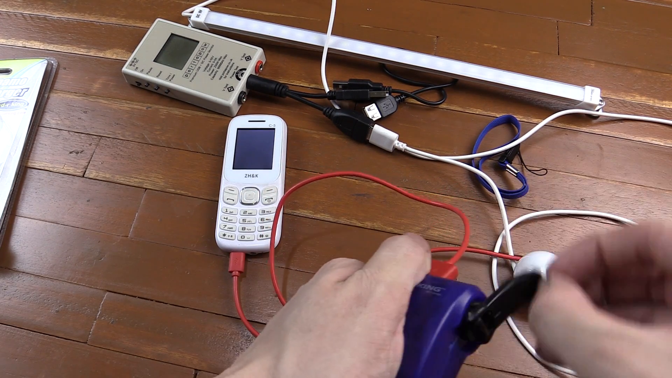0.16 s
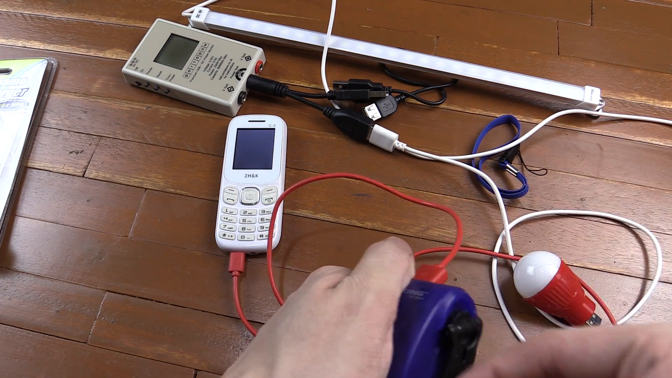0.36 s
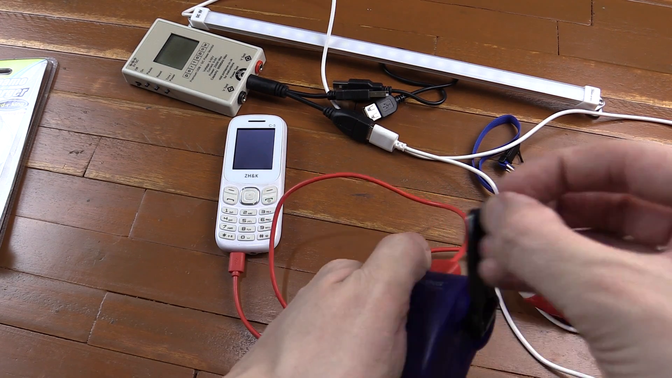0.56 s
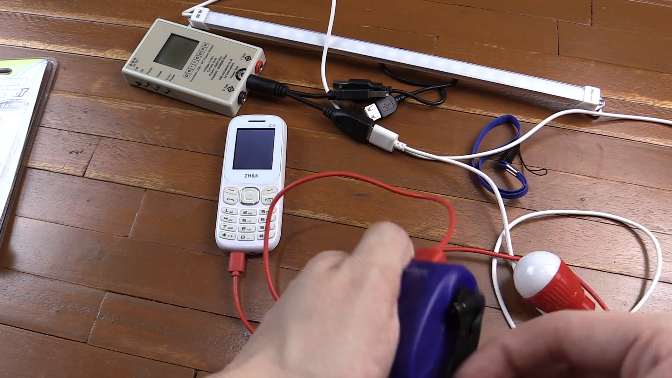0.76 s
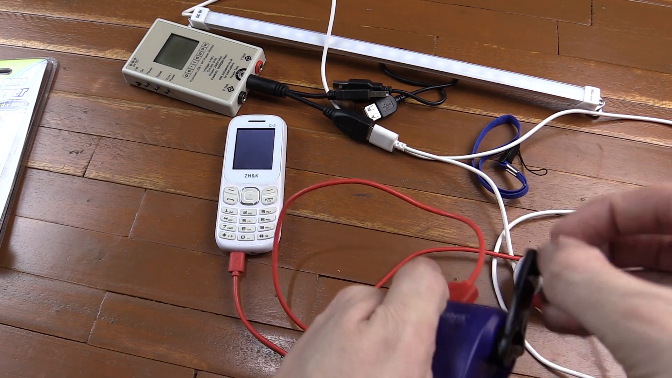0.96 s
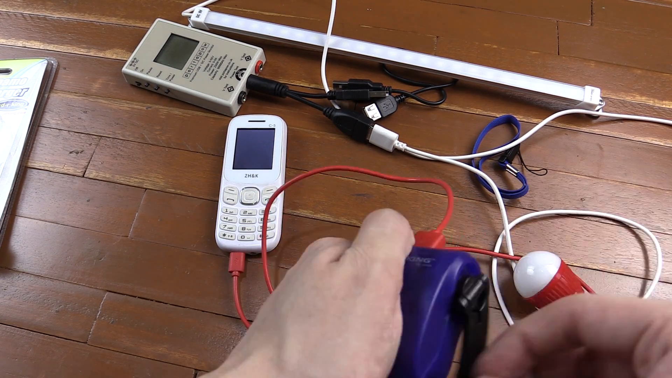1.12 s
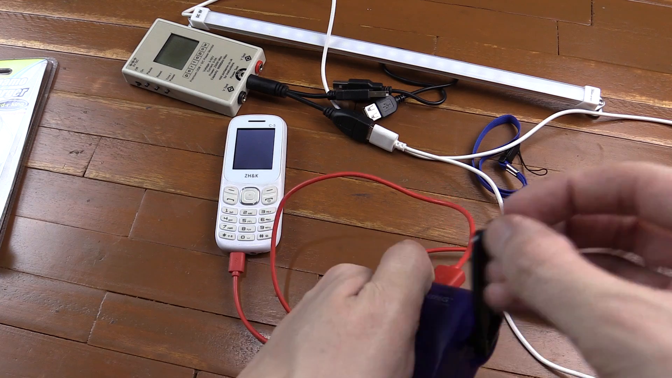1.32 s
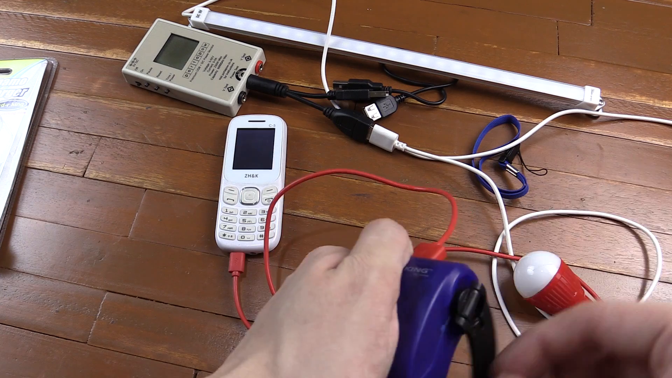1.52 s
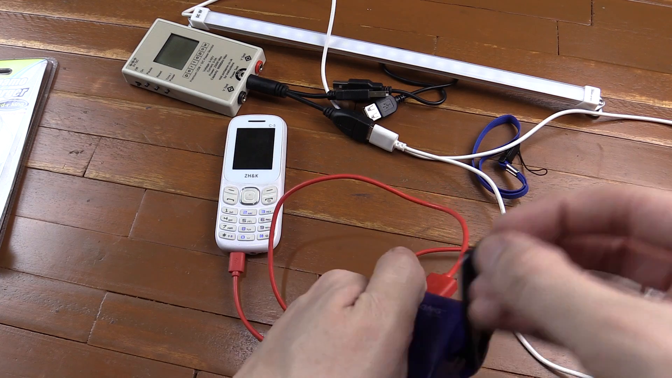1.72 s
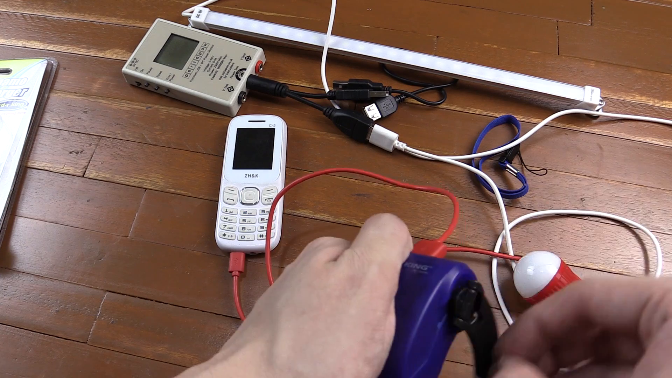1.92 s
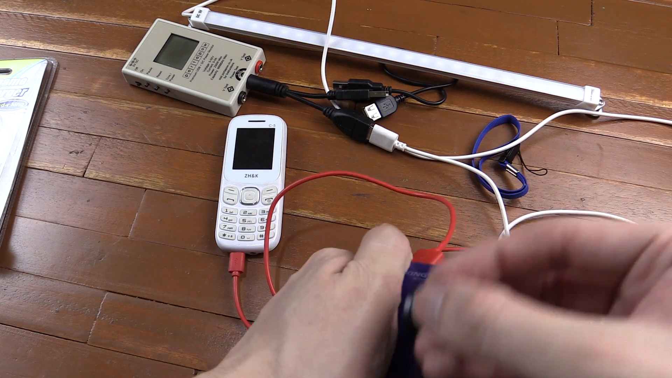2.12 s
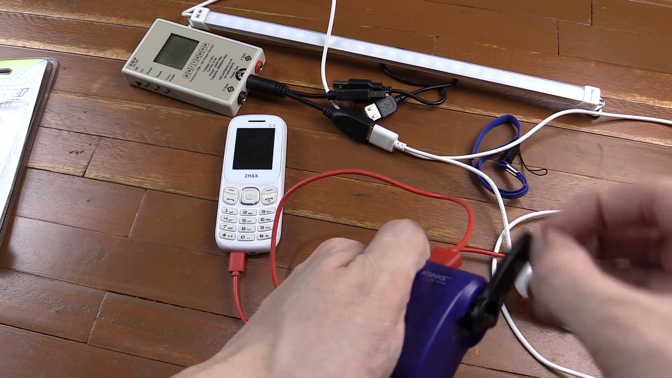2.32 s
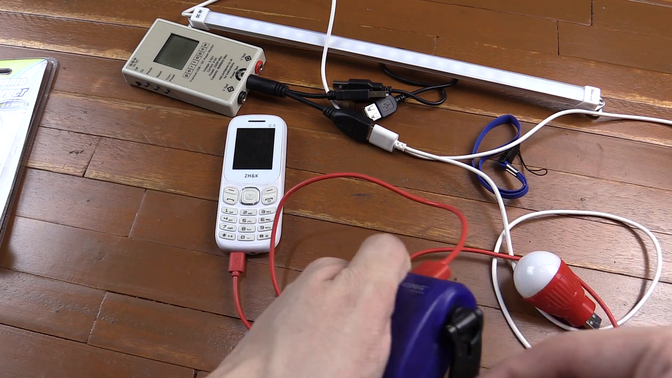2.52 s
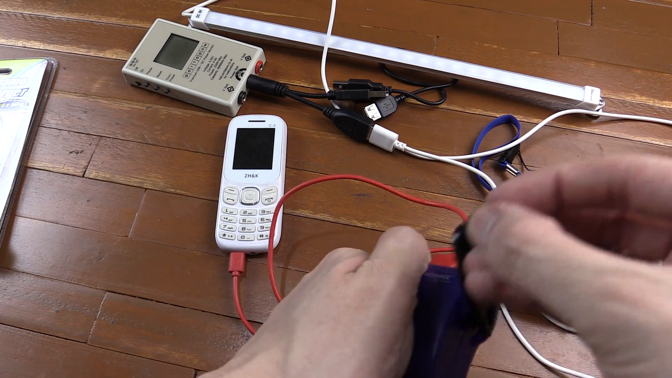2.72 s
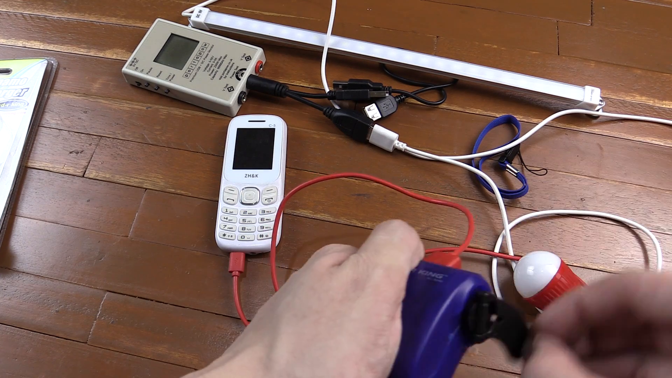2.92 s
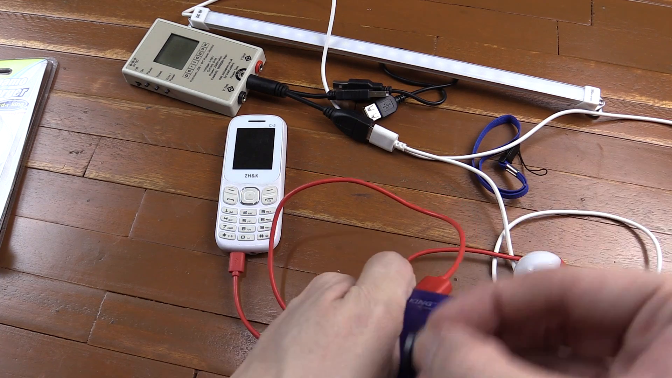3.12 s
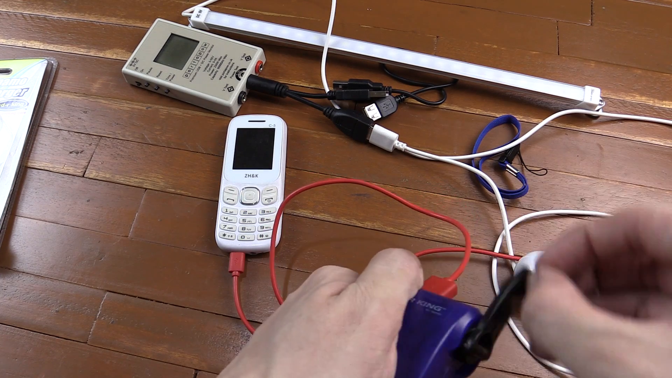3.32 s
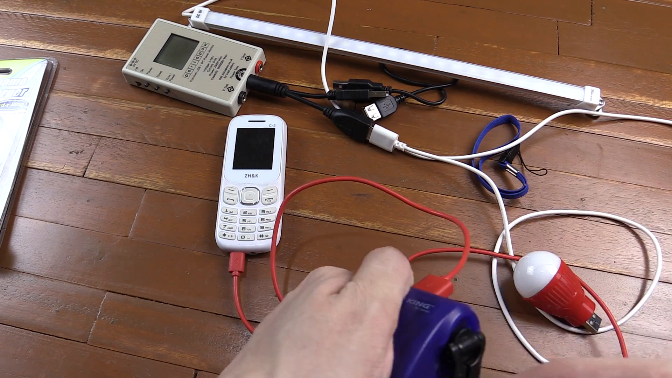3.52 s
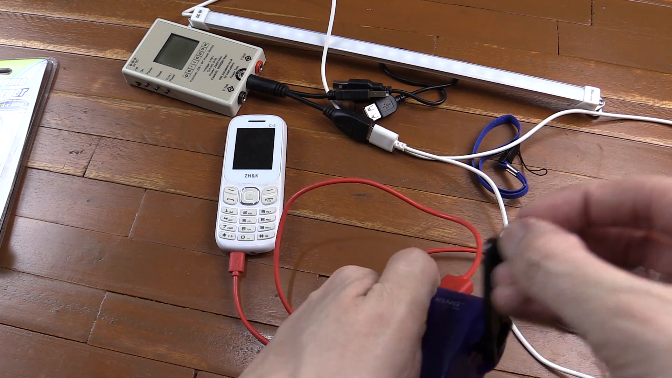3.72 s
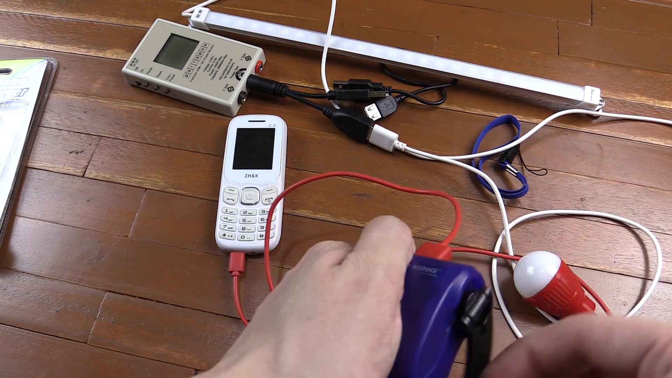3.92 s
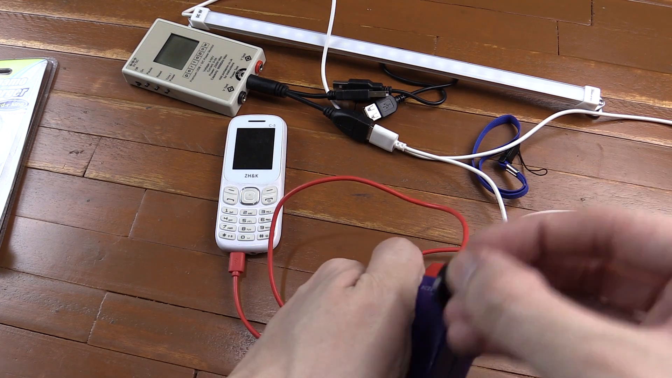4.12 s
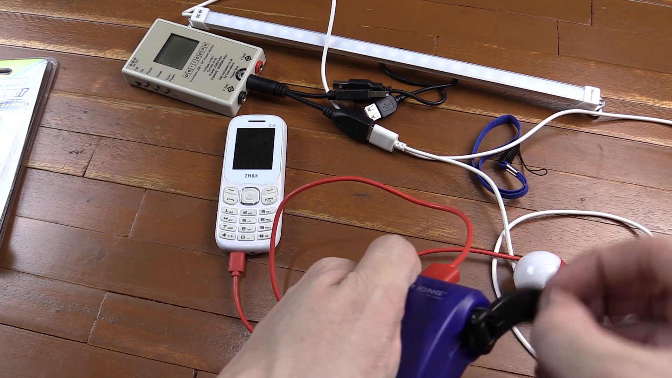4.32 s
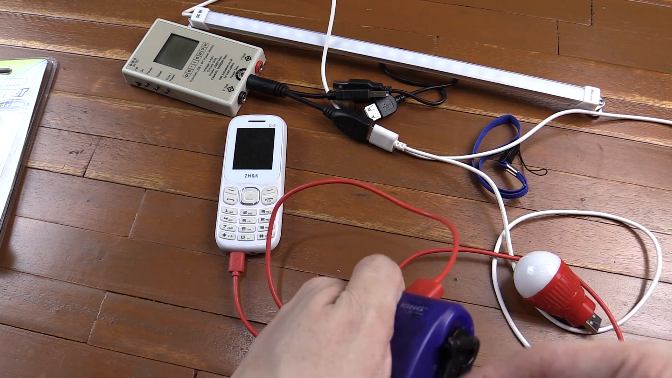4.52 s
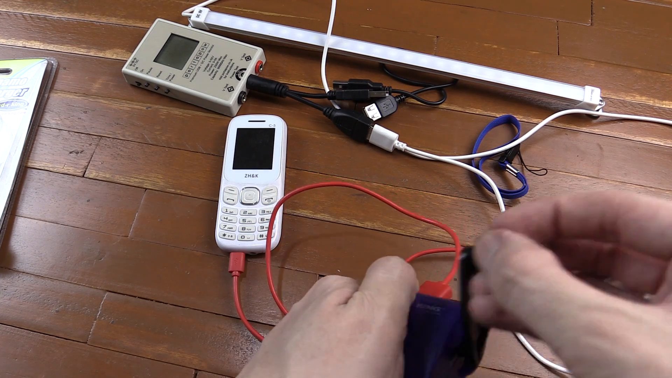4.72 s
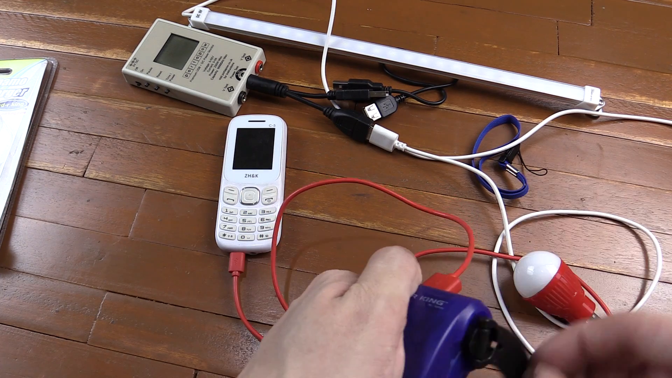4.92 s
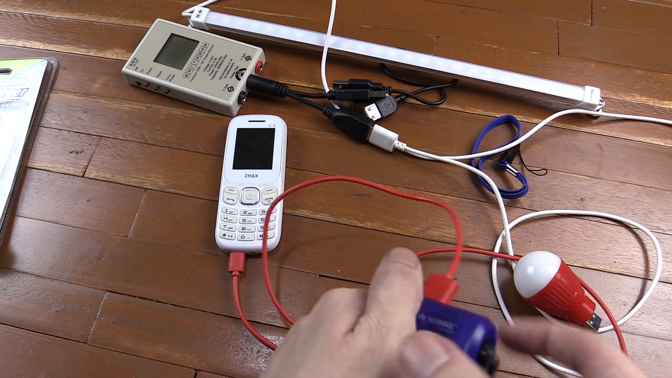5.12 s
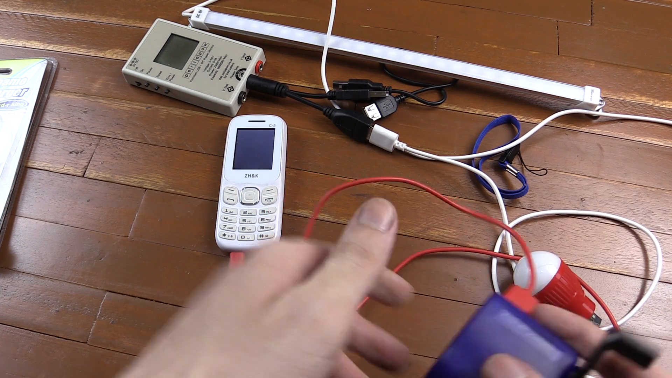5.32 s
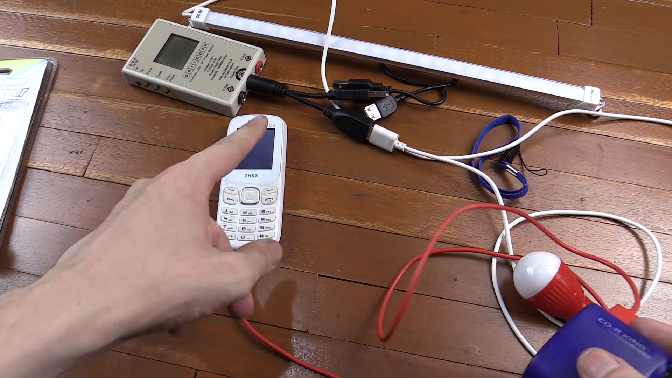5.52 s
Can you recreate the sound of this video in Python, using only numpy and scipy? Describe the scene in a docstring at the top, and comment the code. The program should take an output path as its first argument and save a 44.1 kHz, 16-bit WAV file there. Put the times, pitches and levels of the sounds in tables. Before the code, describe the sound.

Rhythmic buzzy whirring of a little hand-cranked dynamo in a quiet room, with sharp ticks of slipping teeth before it runs down into plastic creaking.

```python
"""A small plastic hand-crank dynamo, turned about twice a second above a wooden floor in a quiet room.
Place: heard in stereo, slightly to the right, with early scatter, short room sound and a low hum.
A twelve-tooth pinion whines; loose teeth rattle the casing, then bite and buzz on pushes and pulls.
Noise bursts at each tooth contact make the grinding; resonances rise through it with each turn.
Sharp ticks mark slipping teeth; the gears run down, then the casing creaks and bumps in the hands."""
import sys
import numpy as np
from scipy import signal
from scipy.fft import rfft, irfft, next_fast_len
from scipy.io import wavfile
from scipy.ndimage import uniform_filter1d, map_coordinates

SR = 44100
rng = np.random.default_rng(int(sys.argv[2]) if len(sys.argv) > 2 else 0)


def dump_mix(stems):
    """Bounce the given channels to the path in sys.argv[1] as a 16-bit WAV at rate SR."""
    frames = np.atleast_2d(stems).T  # one column per channel
    limited = np.clip(frames, -1, 1)  # hard clip at full scale
    pcm = np.round(limited * 32767).astype(np.int16)
    wavfile.write(sys.argv[1], SR, pcm)


N = 249606
TIME = np.arange(N) / SR   # s
TEETH = 12   # on the pinion


def from_db(db):
    """Decibels to gain."""
    return 10 ** (np.asarray(db) / 20)


def rms_one(x):
    """Scale to unit power."""
    return x / np.sqrt(np.mean(x ** 2) + 1e-20)


def in_time(rows):
    """One curve per column after the first (time), joined by straight lines."""
    s, *columns = np.transpose(rows)
    return [np.interp(TIME, s, column) for column in columns]


def colour(x, spectrum):
    """Causal (minimum-phase) filter through points of (frequency [Hz], gain [dB])."""
    size = 2 * next_fast_len(N)
    hz, db = np.transpose(spectrum)
    grid = np.maximum(np.fft.rfftfreq(size, 1 / SR), 1)
    gain_db = np.interp(np.log(grid), np.log(hz), db)
    # folding the cepstrum onto positive time gives minimum phase
    cepstrum = irfft(np.log(from_db(gain_db)))
    cepstrum[1:size // 2] *= 2
    cepstrum[size // 2 + 1:] = 0
    return irfft(rfft(x, size) * np.exp(rfft(cepstrum)))[..., :N]


def band(x, low, high):
    """Band-pass between two frequencies in Hz."""
    return signal.sosfilt(signal.butter(4, [low, high], "band", fs=SR, output="sos"), x)


def drift(rate):
    """Slow chance with spread 1, drawn anew `rate` times a second."""
    knots = rng.standard_normal(4000)
    return rms_one(np.interp(TIME * rate, np.arange(len(knots)), knots))


def clicks_at(times, sizes):
    """A train of single-sample clicks."""
    samples = np.clip(np.round(np.asarray(times) * SR), 0, N).astype(int)
    return np.bincount(samples, sizes, N + 1)[:N]


def random_clicks(per_s, spread_db):
    """Clicks at random moments and of uneven size."""
    sizes = from_db(spread_db * np.clip(rng.standard_normal(N), -2, 2))
    return (rng.random(N) < per_s / SR) * sizes


def bursts(clicks, t60, texture=None):
    """Every click scatters into a decaying puff of vibration, random unless a texture is given."""
    r = from_db(-60 / (t60 * SR))
    power = signal.lfilter([1], [1, -r * r], clicks ** 2 + 1e-18)
    return np.sqrt(power) * (rng.standard_normal(N) if texture is None else texture)


def even(x, span_s=0.072):
    """Take out slow swings of level, keep the grain."""
    local_power = uniform_filter1d(x ** 2, int(span_s * SR) + 1)
    return x / np.sqrt(np.maximum(local_power, 1e-12))


def resonance(x, hz, width_hz):
    """What a resonance picks out of x; its centre may move."""
    turn = np.exp(2j * np.pi * np.cumsum(np.broadcast_to(hz, x.shape)) / SR)
    r = np.exp(-np.pi * width_hz / SR)
    # shift the centre to zero, low-pass, shift back
    return 2 * np.real(turn * signal.lfilter([1 - r], [1, -r], x / turn + 1e-18))


def stroke(s, length, attack_s, release_s):
    """Force of one stroke of the hand: rise, hold, fall."""
    corners = [s - attack_s, s, s + length, s + length + release_s]
    return np.interp(TIME, corners, [0, 1, 1, 0])


# speed of the gears, braked by each push and gathering again: (time [s], tooth contacts [per s])
SPEED = [(0, 570), (.1, 528), (.27, 587), (.34, 565), (.45, 555), (.56, 585), (.83, 935), (1.08, 745),
         (1.35, 675), (1.47, 682), (1.64, 776), (1.79, 756), (1.88, 705), (2.01, 562), (2.09, 563),
         (2.24, 502), (2.5, 583), (2.62, 567), (2.69, 539), (2.8, 544), (3.05, 642), (3.25, 537),
         (3.5, 590), (3.63, 569), (3.77, 618), (3.95, 670), (4.07, 567), (4.25, 504), (4.37, 560),
         (4.55, 577), (4.77, 498), (4.85, 518), (4.96, 581), (5.03, 578), (5.11, 592), (5.4, 180)]


def gear_speed(inertia_s=.03):
    """Tooth contacts per second, smoothed by the rotor's inertia."""
    return uniform_filter1d(in_time(SPEED)[0], int(inertia_s * SR))


def free_share(speed):
    """How freely the gears spin, 0-1: at speed the teeth bounce and lose their even beat."""
    return np.interp(speed, [628, 690], [0, 1])


# the hand pulls the handle back round the bottom:
# (time [s], hold [s], force [about 1 is full], bite [0-1])
PULLS = [(0.267, 0.018, 1.17, 0.77), (0.706, 0.089, 1.05, 0.07), (1.114, 0.01, 0.63, 0.2),
         (1.554, 0.065, 0.61, 0.1), (1.89, 0.016, 0.66, 0), (2.44, 0.085, 0.87, 0.15),
         (2.9, 0.18, 0.94, 0.29), (3.442, 0.044, 1.3, 0.28), (3.88, 0.05, 0.94, 0.05),
         (4.42, 0.09, 1.05, 0.34), (4.968, 0.034, 1.17, 0.3)]
PULL_ATTACK_S, PULL_RELEASE_S = 0.17, 0.14


def pull_force(lead_s=0):
    """Force of all the pulls together, shifted earlier by lead_s."""
    return sum(force * stroke(s - lead_s, length, PULL_ATTACK_S, PULL_RELEASE_S)
               for s, length, force, _ in PULLS)


# the hand pushes the handle over the top:
# (time [s], hold [s], force [about 1 is full], grit: tilt towards treble [dB], bite [0-1])
PUSHES = [(-0.035, 0.042, 0.92, -1, 0.54), (0.453, 0.068, 0.91, -1, 0.27), (0.848, 0.013, 0.83, -1.5, 0.4),
          (1.244, 0.052, 1, -1.3, 0.02), (1.636, 0.12, 1, -0.9, 0.15), (2.074, 0.1, 0.8, -1, 0.45),
          (2.622, 0.071, 0.85, -1.5, 0.45), (3.114, 0.11, 0.89, -0.3, 0.11),
          (3.598, 0.13, 1.02, -0.5, 0.25), (4.041, 0.072, 0.7, -1.3, 0.22), (4.58, 0.084, 0.8, -1, 0.47),
          (5.092, 0.041, 0.7, -2, 0.03)]
BITE_ATTACK_S, BITE_RELEASE_S = 0.041, 0.047


def bite_share():
    """How firmly pushes and pulls press the teeth together, 0-1."""
    strokes = [(s, length, bite) for s, length, _, _, bite in PUSHES]
    strokes += [(s, length, bite) for s, length, _, bite in PULLS]
    total = sum(bite * stroke(s, length, BITE_ATTACK_S, BITE_RELEASE_S) for s, length, bite in strokes)
    return np.clip(total, 0, 1)


def tooth_hits(turns, wear_db, chance_db, jitter_s):
    """One click per tooth; each tooth has its own strength, so the pattern repeats with the pinion."""
    tooth = np.arange(int(turns[-1] * TEETH))
    wear = rng.standard_normal(TEETH)
    wear = rms_one(wear - wear.mean())
    chance = np.clip(rng.standard_normal((4000, 2)), -2, 2)[tooth]
    times = np.interp(tooth / TEETH, turns, TIME) + jitter_s * chance[:, 0]
    return clicks_at(times, from_db(wear_db * wear[tooth % TEETH] + chance_db * chance[:, 1]))


def flanks(turns, size=900):
    """The roughness of the tooth flanks, which comes round again with every turn of the pinion."""
    roughness = rng.standard_normal(size)
    return rms_one(map_coordinates(roughness, [turns % 1 * size], order=3, mode="grid-wrap"))


FLANK_SHARE = .6   # share of the tooth scatter's power that repeats with the pinion


def loose_mesh(turns):
    """Loose pinion teeth: a click at each contact and a short scatter from the rough flanks."""
    hits = tooth_hits(turns, wear_db=1.8, chance_db=1.5, jitter_s=.00012)
    repeating = np.sqrt(FLANK_SHARE) * flanks(turns)
    scatter = repeating + np.sqrt(1 - FLANK_SHARE) * rng.standard_normal(N)
    return from_db(-3.5) * rms_one(hits) + rms_one(bursts(hits, t60=0.0086, texture=scatter))


USUAL_SPEED = 600   # tooth contacts per s


def backlash(speed):
    """The big wheels clack across their play at random, more often at higher speed."""
    clacks = random_clicks(per_s=340 * speed / USUAL_SPEED, spread_db=2.0)
    blows = rms_one(bursts(clacks, t60=0.011)) + from_db(-4) * rms_one(clacks)
    return colour(blows, [(2200, -6.0), (4500, -8.0), (7000, 5.0), (12000, -16.0)])


# click of a firmly meshed tooth: (frequency [Hz], gain [dB])
BITE_COLOUR = [(300, -36), (600, -33), (1100, -11), (1700, -3.5), (2400, -4), (3600, 3.5), (5000, -2),
               (6700, -8), (9000, -28), (15000, -47)]


def firm_teeth(turns):
    """Teeth under load click in an even train, each click with a short scatter."""
    hits = tooth_hits(turns, wear_db=1.3, chance_db=1.8, jitter_s=.000045)
    scatter = rms_one(bursts(hits, t60=.004))
    return rms_one(colour(scatter * from_db(-5) - rms_one(hits), BITE_COLOUR))


# broad response of the plastic shell: (frequency [Hz], gain [dB])
CASING = [(300, -27.5), (500, -26.5), (700, -15), (1100, -2), (1550, -1), (2150, 2.5), (2550, 2.5),
          (3300, 4), (4400, -0.5), (5500, -2.5), (6700, -1.5), (8500, -20), (12000, -30.5), (15000, -37)]
# its sharper resonances: (frequency [Hz], width [Hz], level over the broad response [dB])
CASING_MODES = [(762, 14, 0.5), (887, 5.5, 7.5), (1090, 81, -16), (1170, 26, -8), (1387, 33, -1.5),
                (1530, 33, -19), (1743, 51, 3), (1910, 140, -9), (1997, 30, -2), (2070, 22, -5),
                (2300, 71, -14), (2940, 290, -2), (3105, 41, 5.5), (3480, 28, -25), (3363, 93, 5.5),
                (3890, 45, -4), (4336, 42, 1), (5270, 18, -6), (4656, 25, -3), (5970, 160, 4),
                (6256, 16, 9.5)]


def casing(x):
    """The plastic shell: a broad response with narrow resonances on top."""
    out = x.copy()
    for hz, width, db in CASING_MODES:
        r = np.exp(-np.pi * width / SR)
        poles = [1, -2 * r * np.cos(2 * np.pi * hz / SR), r * r]
        out += from_db(db) * (1 - r * r) / 2 * signal.lfilter([1, 0, -1], poles, x)
    return colour(out, CASING)


# tooth noise, one row a band from low to high (knock, clatter, rattle, chatter, sizzle of sliding
# flanks, rub, dry scrape): (idle level [dB], added by a push [dB], by a pull [dB],
# by a doubling of speed [dB], lead on the pull [s], loss when coasting [dB per s])
CONTACT = [(-36.5, 5, 3.5, 0.5, 0.021, 68), (-40.5, 4.5, 3.3, 4, -0.032, 37),
           (-43.5, 8.5, 5.7, -5, 0.019, 64), (-40.5, 6.5, 4.7, 0, -0.021, 45),
           (-50, 10, 10.6, -3.5, 0.02, 70), (-43, 7.5, 4.4, 2, 0.035, 91), (-50, 12, 3.9, 6, -0.026, 74)]
PUSH_ATTACK_S, PUSH_RELEASE_S = 0.053, 0.1
BITE_DB = 5
STOP_S = 5.078   # the hand lets go and the tooth noise starts to fade


def contact_levels(speed, shared_db=0.95, own_db=1.0):
    """Gain of each band: strokes load the teeth, bite lifts the lower middle, the hand is unsteady."""
    pushes = [(force, grit_db, stroke(s, length, PUSH_ATTACK_S, PUSH_RELEASE_S))
              for s, length, force, grit_db, _ in PUSHES]
    push = sum(force * shape for force, _, shape in pushes)
    grit = sum(grit_db * shape for _, grit_db, shape in pushes)
    unsteady_db, bite_db = shared_db * drift(30), BITE_DB * bite_share()
    coasting_s = np.maximum(TIME - STOP_S, 0)
    octaves = np.log2(speed / USUAL_SPEED) * (TIME < STOP_S)
    levels = []
    for row, tilt in zip(CONTACT, np.linspace(-1, 1, len(CONTACT))):
        idle_db, push_db, pull_db, speed_db, lead_s, fade_db_per_s = row
        push_power = from_db(push_db * push) ** 2
        pull_power = from_db(pull_db * pull_force(lead_s)) ** 2
        load = np.sqrt(np.maximum(push_power + pull_power - 1, 1))
        stroke_db = tilt * grit + bite_db * (-1 < tilt <= 0)
        motion_db = speed_db * octaves - fade_db_per_s * coasting_s
        levels.append(load * from_db(idle_db + stroke_db + motion_db + unsteady_db + own_db * drift(20)))
    return levels


# resonances that rise through each turn of the crank: (frequency at the push [Hz], width [Hz],
# level [dB], time after the push when strongest [s], fade either way [s])
SWEEPS = [(1910, 400, -11, -0.039, 0.26), (3630, 510, -7, -0.052, 0.16), (4100, 890, -11, 0.031, 0.12),
          (4210, 530, -6.5, 0.25, 0.19)]
SWEEP_OCTAVES_PER_S = 1.1


def sweeps(x):
    """With every turn of the crank, broad resonances climb through the grinding."""
    out = x.copy()
    for s, *_ in PUSHES:
        for hz, width_hz, db, peak_s, fade_s in SWEEPS:
            near = np.abs(TIME - s - peak_s) < fade_s
            if near.any():
                t = TIME[near] - s
                swell = np.cos(np.pi / 2 * (t - peak_s) / fade_s)
                rising_hz = hz * 2 ** (SWEEP_OCTAVES_PER_S * t)
                out[near] += from_db(db) * swell * resonance(x[near], rising_hz, width_hz)
    return out


# lines of the whine: (order [cycles per pinion turn], relative level [dB], added by a full pull [dB])
WHINE_ORDERS = [(24, -48, 1), (27, -47, 1), (29, -48, 1), (32, -45, 1), (33, -43, 1), (35, -41, 1),
                (36, -38, 2.5), (48, -51, 2), (60, -53, 9), (62, -52, 8), (70, -48, 7), (72, -45, 11.5),
                (84, -49, 7), (108, -54, 5)]
# the gear wheel's own ring: (frequency [Hz], width [Hz], lift [dB])
WHEEL_RING = (1750, 91, 4.7)
WHINE_DB, FREE_LOSS_DB, WHINE_LAG_S = 1, 6, 0.033   # the whine swells just after each pull
WHINE_FLUTTER_DB, WHINE_WOBBLE_RAD = 1.6, .25   # spread of each of two drifts


def whine(turns, turns_per_s):
    """Mesh tones of the gear stages: a pull brings them out, and they swell through the wheel's ring."""
    ring_hz, width_hz, ring_db = WHEEL_RING
    pull = pull_force(-WHINE_LAG_S)
    lines = 0
    for order, db, pull_db in WHINE_ORDERS:
        lift_db = ring_db / (1 + (2 * (order * turns_per_s - ring_hz) / width_hz) ** 2)
        phase = 2 * np.pi * order * turns + WHINE_WOBBLE_RAD * (drift(20) + drift(130))
        flutter_db = WHINE_FLUTTER_DB * (drift(25) + drift(140))
        lines = lines + from_db(db + pull_db * pull + lift_db + flutter_db) * np.sin(phase)
    # spinning free, the teeth bounce and the tones weaken; they stop with the crank
    level = from_db(WHINE_DB - FREE_LOSS_DB * free_share(turns_per_s * TEETH))
    return lines * level * np.interp(TIME, [5.1, 5.15], [1, 0])


# edges of the tooth-noise bands [Hz]
CONTACT_EDGES_HZ = [250, 2100, 3100, 3700, 5000, 5750, 8000, 17000]
ROTOR_POLES, BOUNCE_TEETH = 3, .13
COGGING_DB, WOBBLE_DB = 0.5, 0.7   # swing at each pole, and once per pinion turn


def gears():
    """Meshing teeth and the backlash of the slower wheels shake the casing."""
    speed = gear_speed()
    bounce = BOUNCE_TEETH * free_share(speed) * (drift(60) + drift(170))
    turns = (np.cumsum(speed) / SR + bounce) / TEETH
    friction = from_db(4.5) * band(rng.standard_normal(N), 4850, 14700)
    # the magnets tug at the rotor, so the teeth are loaded unevenly
    cogging_db = COGGING_DB * np.cos(2 * np.pi * ROTOR_POLES * turns)
    tug = from_db(cogging_db + WOBBLE_DB * np.cos(2 * np.pi * turns))
    loose = rms_one(casing(tug * (loose_mesh(turns) + backlash(speed) + friction)))
    # pressed home, the teeth rattle less and click one by one
    bite = bite_share()
    shell = np.sqrt(1 - bite) * loose + np.sqrt(bite) * tug * firm_teeth(turns)
    grinding = 0
    for low, high, level in zip(CONTACT_EDGES_HZ, CONTACT_EDGES_HZ[1:], contact_levels(speed)):
        # filtered forwards and backwards, so the bands stay aligned in time
        part = band(band(shell, low, high)[::-1], low, high)[::-1]
        grinding = grinding + level * even(part)
    return sweeps(grinding) + whine(turns, speed / TEETH)


# low rumble: (time [s], relative level [dB])
RUMBLE = [(0.0, -58), (5.11, -60.5), (5.19, -57.5), (5.42, -55.5), (5.5, -50.5), (5.66, -51)]
# the room's drone: (time [s], level before its wavering [dB])
DRONE = [(0, -60), (.9, -57.5), (.96, -53), (1.1, -58), (1.4, -48), (1.65, -62), (3.5, -62), (5.66, -74)]
# spectrum of the rumble: (frequency [Hz], gain [dB])
HUM_COLOUR = [(20, -28), (50, -17.5), (75, -17), (115, -8), (140, -4.5), (160, 1), (175, -6.5), (203, 2.5),
              (222, -8.5), (340, -9), (480, -22), (1500, -11.5), (12000, -39.5)]
DRONE_HZ = 138.5


def hum():
    """Room tone: a noise rumble with a wavering sine drone, nearly the same on both sides."""
    rumble_db, drone_db = in_time(RUMBLE) + in_time(DRONE)
    mid, side = rms_one(colour(rng.standard_normal((2, N)), HUM_COLOUR))
    side = colour(side, [(30, -11), (90, -13), (140, -15), (210, -17.5), (330, -5.5)])
    rumble = from_db(rumble_db + 4.5) * (even(mid, span_s=0.14) + side * [[1], [-1]])
    drone_phase = 2 * np.pi * DRONE_HZ * TIME + 1.6 * drift(9)
    return rumble + from_db(drone_db + 2 * drift(15)) * np.sin(drone_phase)


# teeth snapping over under load: (time [s], relative level [dB])
SNAPS = [(0.513, -11), (1.225, -4.5), (1.286, -16), (2.883, -21), (3.1285, -8.5), (3.135, -14),
         (3.177, -5.5), (3.1863, -10), (3.196, -8), (3.232, -13), (3.364, -26), (3.449, -16),
         (3.5947, -4.5), (3.602, -13), (3.644, -14), (3.6527, -4), (3.7073, -11), (3.713, -7.5),
         (3.726, -14), (4.181, -12.5), (4.5637, -9.5), (5.125, -9)]
# ring after each tick: (frequency [Hz], width [Hz], level [dB])
SNAP_RING = (3820, 220, 4)


def snaps():
    """A tooth slips under load with a sharp tick and a short ring."""
    s, db = np.transpose(SNAPS)
    slips = clicks_at(s, from_db(db))
    tick = from_db(-4.0) * slips + from_db(-15.5) * bursts(slips, t60=0.041)
    tick = colour(tick, [(300, -21), (600, -6), (1500, 0), (3500, 6.0), (7000, 2), (9000, -3), (15000, -20)])
    hz, width_hz, ring_db = SNAP_RING
    return tick + from_db(ring_db) * resonance(tick, hz, width_hz)


# soft bumps of the hands on the casing: (time [s], relative level [dB])
BUMPS = [(1.19, -47), (3.75, -50), (3.95, -50), (5.247, -46), (5.443, -44), (5.51, -51), (5.57, -53),
         (5.63, -52)]
# their spectrum: (frequency [Hz], gain [dB])
BUMP_COLOUR = [(30, -28), (95, -21), (160, 1), (350, 5), (600, 1), (1200, -32)]


def bumps():
    """Hands bump the shell: low, soft puffs of noise."""
    s, db = np.transpose(BUMPS)
    return colour(bursts(clicks_at(s, from_db(db + 12.0)), t60=0.33), BUMP_COLOUR)


# the casing rubbing in the hands: (time [s], relative level [dB])
CREAK = [(5.26, -42.5), (5.34, -44.5), (5.43, -49.5), (5.458, -39), (5.5, -33.5), (5.56, -34), (5.66, -44)]
# jerks of the creak: (time [s], relative level [dB])
JERKS = [(5.153, -14), (5.186, -14), (5.208, -23), (5.227, -16.5), (5.357, -24), (5.382, -15), (5.386, -19),
         (5.402, -24), (5.4166, -17.5), (5.4448, -10.5), (5.4612, -11), (5.466, -13), (5.472, -14),
         (5.484, -16), (5.4913, -13), (5.499, -11), (5.511, -13), (5.524, -20), (5.541, -14), (5.5625, -21),
         (5.593, -20), (5.623, -19)]
# spectrum of both: (frequency [Hz], gain [dB])
CREAK_COLOUR = [(150, -24), (350, -26), (600, -15), (1000, -8), (1500, -3.5), (2300, -2), (2600, -1),
                (3020, -2), (3350, -8.5), (4200, -6.5), (5500, -13), (8000, -24), (15000, -47)]
# rings of the gripped shell: (frequency [Hz], width [Hz], level over the creak [dB])
GRIP_MODES = [(2290, 110, -3), (2980, 92, 3)]


def creaks():
    """Plastic sticks and slips in the grip: dense small slips, single jerks and the shell's ring."""
    creak_db, = in_time(CREAK)
    slips = bursts(random_clicks(per_s=870, spread_db=0.5), t60=0.02)
    slips = even(colour(slips, CREAK_COLOUR), span_s=0.015)
    creak = slips * from_db(creak_db + 1.7) * np.interp(TIME, [5.17, 5.25], [0, 1])
    s, db = np.transpose(JERKS)
    jolts = clicks_at(s, from_db(db))
    jerks = colour(from_db(4.0) * jolts + from_db(-3) * bursts(jolts, t60=.028), CREAK_COLOUR)
    thin_ticks = from_db(-37) * bursts(jolts, t60=.01)   # each jerk starts with one
    rub = creak + jerks + thin_ticks
    return rub + sum(from_db(db) * resonance(rub, hz, width_hz) for hz, width_hz, db in GRIP_MODES)


# the body knocks against the palm: (time [s], level [dB])
KNOCK = (5.2495, -39.5)
# its decaying tones: (frequency [Hz], 60 dB decay [s], level over the knock [dB])
KNOCK_MODES = [(290, 0.049, -10), (400, 0.042, 0.5), (560, 0.038, 1)]


def knock():
    """One dull, hollow knock as the grip changes: a few short decaying tones."""
    s, level_db = KNOCK
    t = np.maximum(TIME - s, 0)
    out = 0
    for hz, t60, db in KNOCK_MODES:
        decay_db = -60 * np.minimum(t / t60, 2)
        out = out + from_db(level_db + db + decay_db) * np.sin(2 * np.pi * hz * t)
    return out


def room(x, t60, wet_db, early_db):
    """Early scatter from floor and hands, opposite in sign on the two sides, then the walls."""
    t = TIME[:SR // 2]
    tail = rng.standard_normal((2, len(t))) * from_db(-60 * t / t60) * (t > .006)
    scatter = rng.standard_normal(len(t)) * from_db(-60 * t / .06) * (t > .001)
    side = signal.fftconvolve(x, scatter / np.linalg.norm(scatter))[:N]
    side = colour(side, [(150, -55), (500, 11.0), (1150, -7.5), (1800, 6.0), (2800, 1.5), (4500, 5.5),
                         (6500, 7.0), (10000, 2.0), (14000, -37)])
    walls = signal.fftconvolve(x[None], tail / np.linalg.norm(tail[0]), axes=1)[:, :N]
    walls = colour(walls, [(200, -14.5), (5000, 8.0), (13000, -20.0)])
    return x + from_db(early_db) * side * [[1], [-1]] + from_db(wet_db) * walls


def scene():
    """The dynamo, slightly to the right, in its room."""
    dynamo = gears() + snaps() + bumps() + creaks() + knock()
    placed = room(dynamo, t60=0.15, wet_db=-12.5, early_db=-16.0) * from_db([[-.5], [.5]])
    return placed + hum()


CUTOFF_HZ = 15500


def record(dry):
    """At the microphone the top is cut steeply."""
    return signal.sosfilt(signal.ellip(10, .1, 90, CUTOFF_HZ, fs=SR, output="sos"), dry)


dry = scene()
out = record(dry)
dump_mix(out)
```